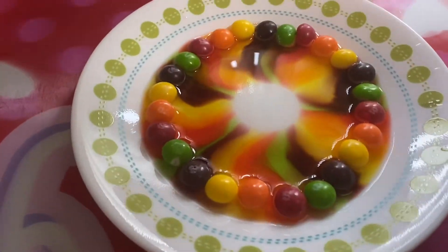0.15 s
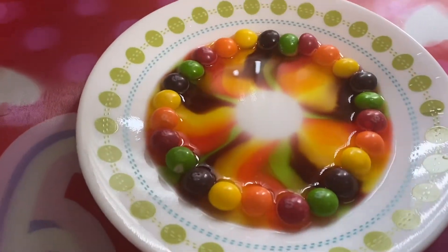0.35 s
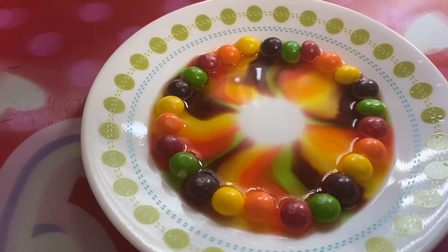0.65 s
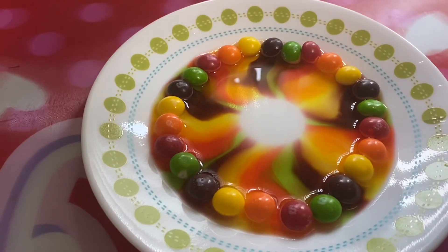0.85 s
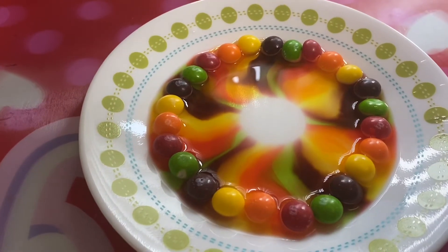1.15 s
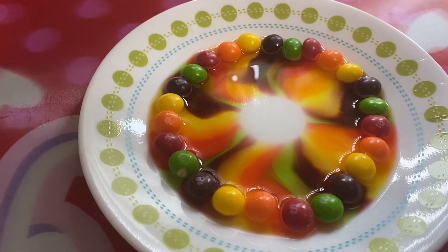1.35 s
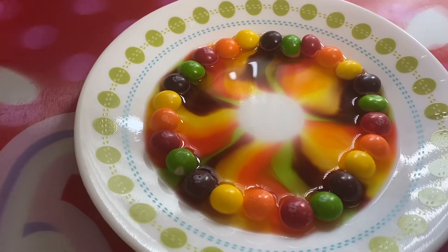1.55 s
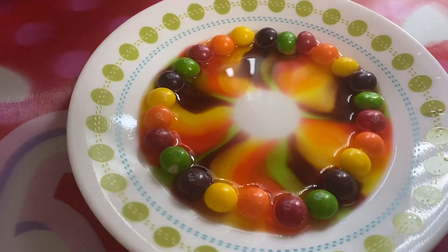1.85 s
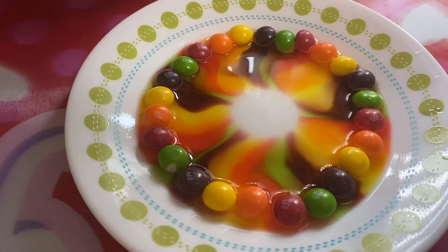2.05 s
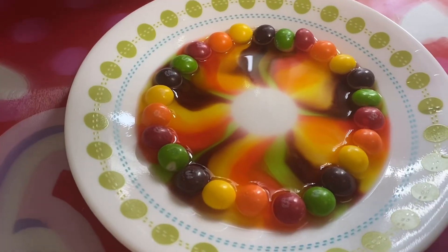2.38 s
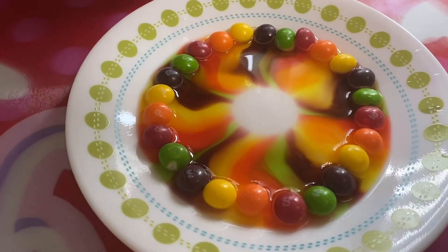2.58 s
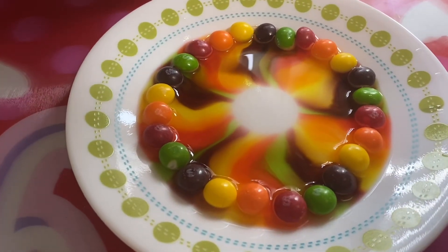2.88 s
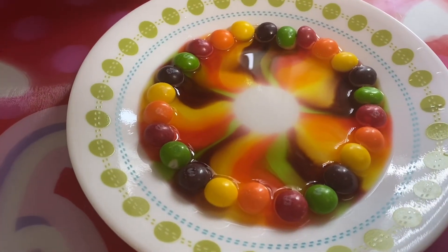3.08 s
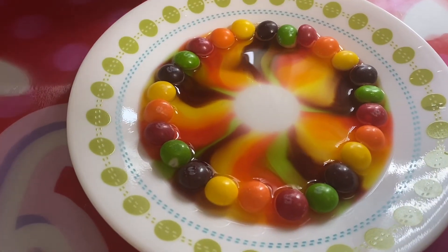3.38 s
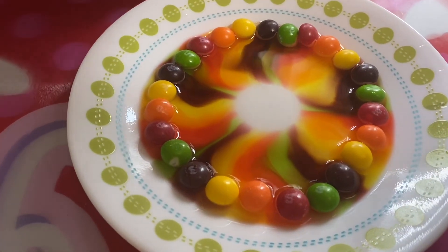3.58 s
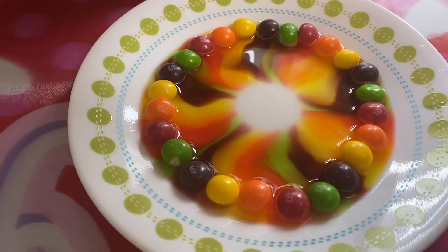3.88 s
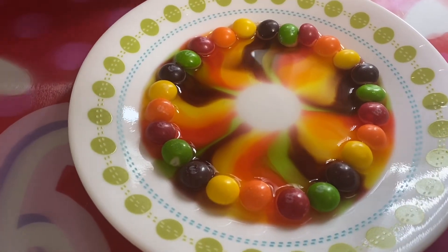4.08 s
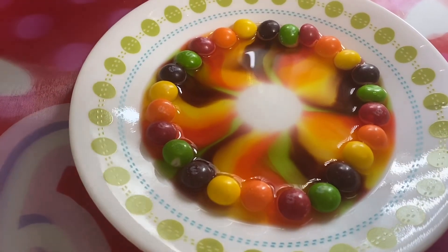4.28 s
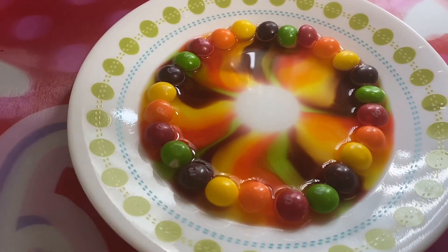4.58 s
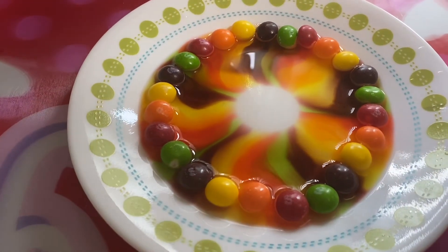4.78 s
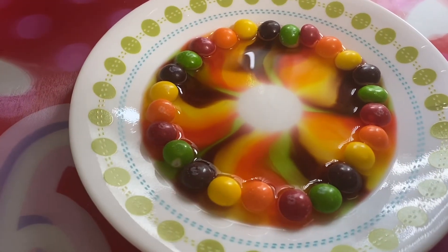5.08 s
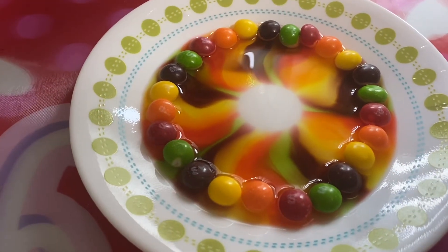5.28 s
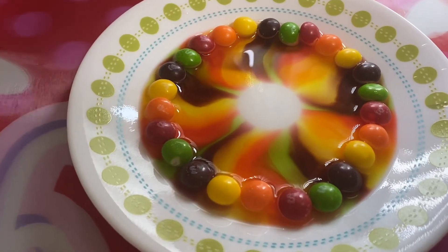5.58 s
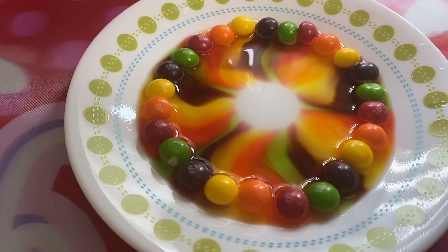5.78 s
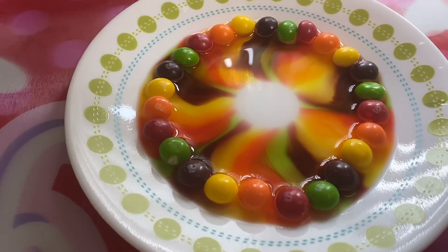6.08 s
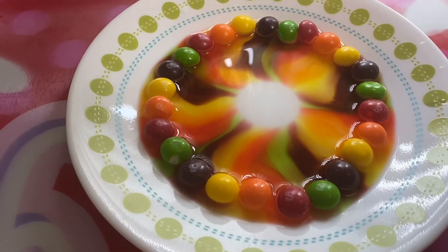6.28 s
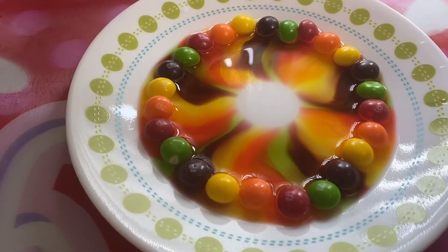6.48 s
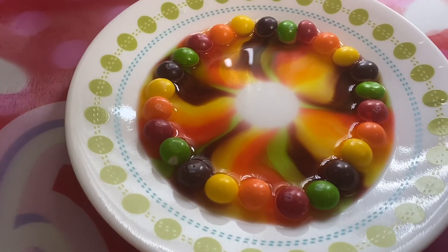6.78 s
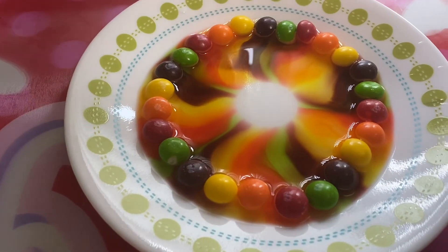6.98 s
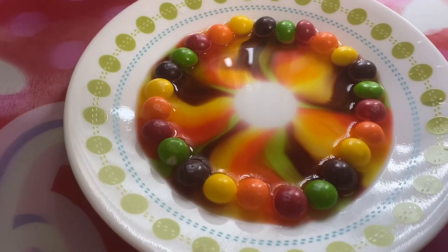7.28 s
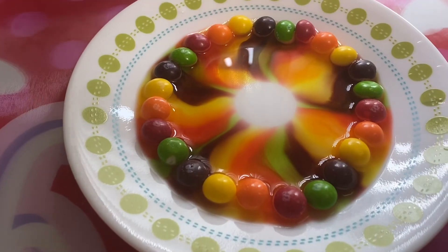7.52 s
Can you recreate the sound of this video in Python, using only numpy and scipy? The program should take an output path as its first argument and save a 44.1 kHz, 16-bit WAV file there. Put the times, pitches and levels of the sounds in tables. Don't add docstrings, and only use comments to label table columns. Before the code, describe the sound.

A close tree cricket chirps clear, ringing bursts over answering neighbours, a soft lower insect chorus and faint hum, with a brief early dropout and handling knocks.

```python
import sys
import numpy as np
from scipy import signal
from scipy.fft import rfft, irfft
from scipy.io import wavfile
from scipy.ndimage import uniform_filter1d

SR = 44100
rng = np.random.default_rng(int(sys.argv[2]) if len(sys.argv) > 2 else 0)


def volts_from_decibels(level):
    exponent = np.asarray(level, float) / 20
    return 10 ** exponent


def log_audio(samples):
    frames = np.atleast_2d(samples).T
    limited = np.clip(frames, -1, 1)
    pcm = np.round(limited * 32767).astype(np.int16)
    wavfile.write(sys.argv[1], SR, pcm)


N = 337365
TIME = np.arange(N) / SR


def level(x, db):
    return x * volts_from_decibels(db) / np.sqrt(np.mean(x ** 2))


def column(table, order):
    return np.interp(TIME, [row[0] for row in table], [row[order] for row in table])


def walk(rate):
    k = int(SR / rate)
    held = np.repeat(rng.standard_normal(N // k + 1), k)
    return uniform_filter1d(uniform_filter1d(held, k), k)[:N]


def noise(shape, alike_hz, lag=0.):
    hz = np.maximum(np.fft.rfftfreq(N, 1 / SR), 1)
    f, db = np.transpose(shape)
    gain = volts_from_decibels(np.interp(np.log(hz), np.log(f), db, left=-90, right=-90))
    mid, side = rfft(rng.standard_normal((2, N))) * gain
    side = side * hz / (hz + alike_hz)
    left = (mid + side) * np.exp(-2j * np.pi * hz * lag)
    return level(irfft(np.array([left, mid - side]), N), 0)


def echo(x, t60, wet_db):
    t = np.arange(int(t60 * SR)) / SR
    decay = np.exp(-np.log(1000) * t / t60) * (1 - np.exp(-t / 0.0037))
    tail = rng.standard_normal((2, len(t))) * decay
    tail *= volts_from_decibels(wet_db) / np.sqrt(np.sum(tail ** 2, axis=1, keepdims=True))
    return signal.fftconvolve(x[None], tail, axes=1)[:, :N]


def strokes(rows, hz, fall, scatter_db, spread):
    env, phase = np.zeros(N), np.zeros(N)
    chance = rng.standard_normal((len(rows), 4))
    for (s, length, db), (late, louder, sharper, start) in zip(rows, chance):
        u = np.linspace(-.5, .5, int(length * 1.15 * SR))
        at = int((s + .0006 * late) * SR + u[0] * len(u)) + np.arange(len(u))
        ok = (at >= 0) & (at < N)
        swell = volts_from_decibels(db + scatter_db * louder) * np.tanh(2.6 * np.cos(np.pi * u) ** 2)
        pitch = hz * (1 + spread * sharper + fall * (u ** 2 - u))
        env[at[ok]] = swell[ok]
        phase[at[ok]] = (2 * np.pi * (start + np.cumsum(pitch) / SR))[ok]
    return env, phase


def chorus(voices_hz, period, fall, spread, direct_db, octave_db, t60):
    out = 0
    for hz in voices_hz:
        times = np.cumsum(period * (1 + .2 * rng.random(int(N / SR / period))))
        rows = [(s, .7 * period, 0) for s in times]
        env, phase = strokes(rows, hz, fall, scatter_db=3.0, spread=spread)
        turned = phase + rng.uniform(-0.61, 0.54) * np.array([[1], [-1]])
        song = env * (np.sin(turned) + volts_from_decibels(octave_db) * np.sin(2 * turned))
        out = out + volts_from_decibels(direct_db) * song + echo(song[0], t60, wet_db=-3.5)
    return level(out, 0)


def background():
    # (frequency [Hz], density [dB per Hz])
    air_shape = [(15, -44), (25, 4.5), (59, -6.5), (99, -3.5), (124, -4), (281, -15), (554, -20),
                 (1070, -28), (1370, -29.5), (1600, -30), (2080, -63.5), (3520, -120)]
    far_shape = [(1500, -28), (1750, -14), (1950, -10), (2300, 2), (2800, -6), (2950, -12), (3150, -41.5)]
    hiss_shape = [(2060, -48), (3500, -2.5), (3920, -8), (4840, -6), (5380, -8.5), (12300, -15),
                  (14400, -16.5), (15500, -24)]
    air = noise(air_shape, alike_hz=250, lag=.0001) * volts_from_decibels(-62 + np.array([[-1], [1]]))
    far = noise(far_shape, alike_hz=2350, lag=0.00021) * volts_from_decibels(-53.5 + 2.85 * walk(25))
    hiss = noise(hiss_shape, alike_hz=500) * volts_from_decibels(-76)
    return air + far + hiss


def machine():
    # (time [s], frequency [Hz], level [dB])
    hum = [
        [(0.0, 108, -54), (0.258, 107.5, -58), (0.3, 106, -61)],
        [(0.42, 107, -61), (0.62, 107.6, -64), (2.09, 106.3, -70.5), (2.23, 108.8, -74), (2.31, 108.9, -64),
         (2.94, 108.1, -63.5), (3.0, 108.5, -70), (3.28, 108.6, -65.5), (3.36, 108.4, -80), (3.46, 108.2, -66),
         (3.58, 109, -93), (3.62, 106.8, -71), (3.74, 107.7, -72), (3.96, 104.1, -92), (4.31, 108.5, -67),
         (5.8, 107.4, -59), (7.59, 108.2, -56), (7.65, 108.7, -55)],
    ]
    curve = hum[0] + hum[1]
    phase = 2 * np.pi * np.cumsum(column(curve, order=1)) / SR
    loudness = volts_from_decibels(column(curve, order=2) + 1.7 * walk(7.1))
    return np.sqrt(2) * loudness * np.sin(phase - np.array([[.2], [0]]))


def hand():
    # (time [s], rumble level [dB])
    grip = [
        [(0.0, -70), (0.07, -64), (0.14, -89), (0.228, -61), (0.3, -62)],
        [(0.42, -44), (0.56, -66), (0.6, -52.5), (0.74, -67), (0.88, -46.5), (1.14, -43), (1.22, -54.5),
         (1.3, -44.5), (1.37, -55.5), (1.49, -50.5), (1.59, -62), (1.65, -55), (1.79, -54.5), (1.89, -59.5),
         (2.17, -64), (2.31, -46), (2.41, -65), (2.47, -54), (2.57, -61.5), (2.92, -60.5), (3.12, -71),
         (3.22, -62), (3.26, -61.5), (3.44, -61), (3.48, -61.5), (3.78, -63.5), (4.59, -62.5), (4.71, -68),
         (4.83, -57.5), (5.01, -60.5), (5.11, -52.5), (5.17, -66), (5.33, -62), (5.43, -60.5), (6.0, -62),
         (6.18, -59), (6.24, -59), (6.32, -57), (6.36, -70), (6.42, -62), (6.82, -63.5), (6.88, -59),
         (6.96, -65), (7.09, -58), (7.33, -68), (7.45, -56.5), (7.65, -70)],
    ]
    # (time [s], peak level [dB], frequency [Hz], t60 [s], share of thud [ratio])
    knocks = [
        (0.5, -44.5, 294, 0.11, 0.46),
        (0.809, -56, 330, 0.08, 0.76),
        (.945, -57, 403.5, 0.088, 1.3),
        (1.084, -53, 430, 0.051, 0.98),
        (6.86, -60, 718, 0.23, .05),
    ]
    rumble_shape = [(25, -9.5), (48, -3.5), (65, 3), (85, -13), (110, -24), (300, -32.5), (600, -39)]
    rumble = noise(rumble_shape, alike_hz=8)
    out = rumble * volts_from_decibels(column(grip[0] + grip[1], order=1) + np.array([[-6], [2]]))
    thud = noise([(120, -18), (300, 1.5), (600, -6), (1000, -15.5)], alike_hz=900)
    for s, db, hz, t60, share in knocks:
        t = np.maximum(TIME - s, 0)
        fade = (1 - np.exp(-t / 0.0016)) * np.exp(-np.log(1000) * t / t60)
        tone = np.sin(2 * np.pi * hz * t * (1 + .7 * t))
        out = out + volts_from_decibels(db) * fade * (tone + share * thud) * np.array([[.6], [1.3]])
    return out


def high_cricket():
    # (time [s], length [s], level [dB])
    trills = [
        (.85, .42, -85),
        (1.747, 0.41, -80.5),
        (2.67, 0.48, -84.5),
        (3.3, 0.11, -83),
        (3.919, 0.43, -84),
        (4.8, 0.42, -83),
        (5.4, 0.13, -77.5),
        (6.1, .42, -80.5),
        (6.801, .2, -90),
        (7.278, .17, -86),
    ]
    gate = sum(volts_from_decibels(db) * ((TIME > s) & (TIME < s + length)) for s, length, db in trills)
    song = chorus([4990], period=0.025, fall=0.049, spread=.006, direct_db=-2, octave_db=-40.5, t60=.15)
    return uniform_filter1d(gate, 2500) * song


def lower_chorus():
    # (time [s], level [dB])
    swells = [
        [(0.0, -50), (0.066, -56), (0.082, -55.5), (0.28, -56), (0.3, -55.5)],
        [(0.42, -66), (0.74, -59.5), (1.0, -54.5), (1.24, -69), (1.43, -66), (1.57, -54.5), (1.85, -56),
         (2.13, -70), (2.25, -67), (2.39, -53.5), (2.51, -53.5), (2.96, -70.5), (3.08, -70), (3.14, -58),
         (3.32, -52), (3.5, -59.5), (3.84, -67), (4.08, -54), (4.29, -57), (4.36, -75), (4.47, -61),
         (4.61, -64), (4.75, -53.5), (4.81, -57.5), (4.89, -54), (5.07, -57), (5.13, -66), (5.19, -74.5),
         (5.55, -56.5), (5.78, -55), (6.14, -75.5), (6.32, -54), (6.64, -59), (6.68, -54), (6.74, -66),
         (7.01, -75.5), (7.09, -58.5), (7.35, -52.5), (7.51, -64.5), (7.65, -65.5)],
    ]
    song = chorus([2060, 2030, 1960], period=.022, fall=0.065, spread=0.0095,
                  direct_db=-11.5, octave_db=-46, t60=0.36)
    return song * volts_from_decibels(column(swells[0] + swells[1], order=1) + np.array([[-1], [3]]))


def neighbours():
    # (time [s], level [dB])
    in_step = [(0.0, -32), (0.11, -52.5), (0.22, -55.5), (0.45, -54), (0.56, -46.5), (0.67, -42.5),
               (0.78, -53.5), (0.89, -60), (1.0, -44.5), (1.11, -40), (1.22, -58), (1.33, -56.5),
               (1.44, -47), (1.55, -41.5), (1.66, -60), (1.77, -58), (1.88, -45), (1.99, -45), (2.1, -63.5),
               (2.21, -55), (2.32, -45), (2.43, -40.5), (2.54, -72), (2.65, -53), (2.76, -42), (2.87, -57),
               (2.98, -74), (3.09, -55), (3.2, -41), (3.31, -54), (3.42, -69), (3.53, -46.5), (3.64, -42.5),
               (3.75, -60), (3.86, -74), (3.97, -48), (4.08, -43), (4.19, -51.1), (4.3, -66), (4.41, -53),
               (4.52, -45.8), (4.63, -54), (4.74, -68.5), (4.85, -47.5), (4.96, -45.5), (5.07, -50),
               (5.18, -63), (5.29, -49.5), (5.4, -44), (5.51, -50.5), (5.62, -64), (5.73, -49),
               (5.84, -41.5), (5.95, -57.5), (6.06, -60), (6.17, -57.5), (6.28, -44.5), (6.39, -48.5),
               (6.5, -56), (6.61, -56), (6.72, -45.5), (6.83, -47.5), (6.94, -64.5), (7.05, -54.5),
               (7.16, -43), (7.27, -50.5), (7.38, -59.5), (7.49, -61), (7.6, -45.5)]
    song = chorus([2305, 2340], period=.0225, fall=0.071, spread=0.0058,
                  direct_db=4, octave_db=-31, t60=0.27)
    return song * volts_from_decibels(column(in_step, order=1))


def near_cricket():
    # (time of the first stroke [s], level [dB])
    short_chirps = [(1.429, -27), (1.848, -27), (2.747, -27), (3.142, -27), (4.006, -27), (4.885, -27),
                    (5.292, -27), (6.657, -27.5), (7.563, -27)]
    long_chirps = [(-.07, -26.5), (.974, -27), (2.254, -27), (3.534, -27), (4.406, -27), (5.719, -27),
                   (6.197, -27.5), (7.08, -27)]
    # (time [s], length [s], level [dB])
    hurried = [
        (.587, .013, -30),
        (.61, .018, -27.5),
        (.633, .017, -27),
        (.658, .018, -27),
    ]
    # (length [s], level [dB])
    stroke_times = [0, .0232, .0512, .074, .0978, .1265, .1495, .174]
    stroke_sizes = [(.014, -2), (.019, 0), (.016, -1), (.018, 0), (.018, 0), (.016, 0), (.018, 0),
                    (.018, -1)]
    # (multiple [ratio], level [dB], envelope sharpness [exponent],
    # left minus right [dB], phase turned at the left port [rad])
    partials = [(1, 0, 1.0, -3, .1), (2, -30, .6, -4, .6), (3, -31, 1.8, -8, .1), (4, -56, 1.5, -3, .1),
                (5, -59, 1.5, -2, .1)]
    # (frequency [Hz], density [dB per Hz])
    scrape_shape = [(3600, 1.5), (4700, 4), (6000, -4.5), (7100, 0.5), (8200, -11), (9500, -4),
                    (10800, -14.5), (12000, -11), (15600, -13.5)]
    port_lag = 0.00016

    rows = []
    for chirps, count in ((short_chirps, 5), (long_chirps, 8)):
        for s, db in chirps:
            for dt, (length, d) in zip(stroke_times[:count], stroke_sizes):
                rows.append((s + dt, length, db + d))
    rows.extend(tuple(row) for row in hurried)
    env, phase = strokes(rows, 2374.4, .075, scatter_db=.8, spread=0.0031)

    top = env.max()
    left = np.array([[1], [0]])
    direct = 0
    for k, db, sharp, pan_db, turn in partials:
        flutter = 1.64 * k * walk(260)
        loudness = top * (env / top) ** sharp * volts_from_decibels(db + pan_db * left + flutter)
        direct = direct + loudness * np.sin(k * phase - turn * left)
    hz = np.fft.rfftfreq(N, 1 / SR)
    direct = irfft(rfft(direct) * np.exp(-2j * np.pi * hz * port_lag * left), N)

    linger = np.exp(-1 / (.018 * SR))
    effort = uniform_filter1d(env, 700, origin=-300)
    effort = signal.lfilter([1 - linger], [1, -linger], effort)
    scrape = effort * volts_from_decibels(-35 + 2.5 * walk(30)) * noise(scrape_shape, alike_hz=3000, lag=port_lag)

    dull = signal.sosfilt(signal.butter(2, 3800, fs=SR, output="sos"), direct[1])
    late = echo(dull, t60=.45, wet_db=-13.5)
    early = echo(direct[1], t60=0.065, wet_db=-13.5)
    return direct + scrape + late + early


def without_band_when_loud(x, lo_hz, hi_hz, over_db):
    hz = np.fft.rfftfreq(N, 1 / SR)
    band = irfft(rfft(x) * ((hz > lo_hz) & (hz < hi_hz)), N)
    power = uniform_filter1d(np.mean(x ** 2, axis=0), 1500)
    loud = 10 * np.log10(power + 1e-12) + 8.0 * walk(25)
    loud = np.roll(loud, 1100)
    return x - band * uniform_filter1d(1. * (loud > over_db), 500)


def scene():
    quiet = background() + machine() + hand()
    return quiet + high_cricket() + lower_chorus() + neighbours() + near_cricket()


def top_cut(x):
    return signal.sosfilt(signal.butter(12, 15690, fs=SR, output="sos"), x)


def record(dry):
    bent = dry + np.array([[.15], [.5]]) * dry ** 2
    bent = signal.sosfilt(signal.butter(4, 35, "highpass", fs=SR, output="sos"), bent)
    bent = without_band_when_loud(bent, 3130, 3420, over_db=-54)
    bent = without_band_when_loud(bent, 3400, 3750, over_db=-49)
    bent = without_band_when_loud(bent, 7750, 8300, over_db=-35)
    bent = without_band_when_loud(bent, 2850, 3150, over_db=-35)
    drop_s, back_s, fade_s = .3145, .383, .09
    recovery = 1 - np.exp(-np.maximum(TIME - back_s, 0) / fade_s)
    fade = np.where(TIME < drop_s, 1, recovery)
    return top_cut(bent * uniform_filter1d(fade, 120))


dry = scene()
out = record(dry)
log_audio(out)
```